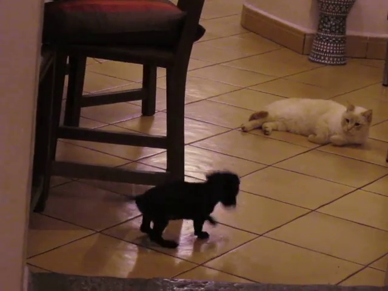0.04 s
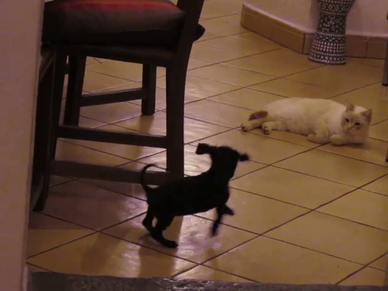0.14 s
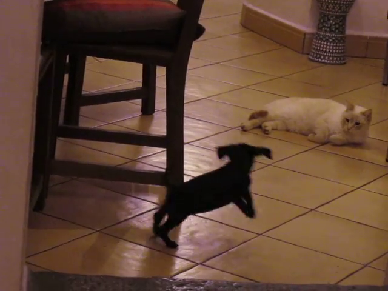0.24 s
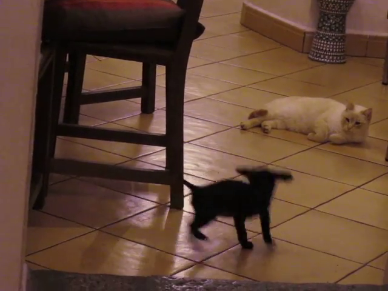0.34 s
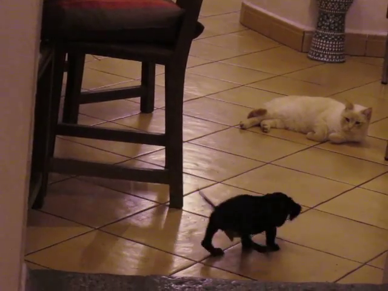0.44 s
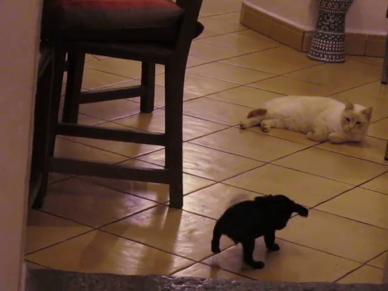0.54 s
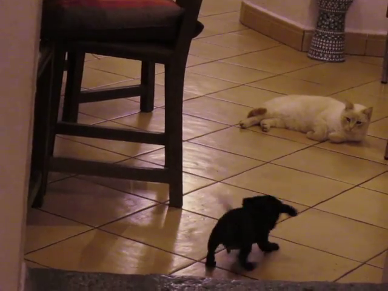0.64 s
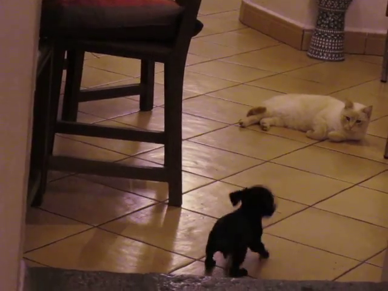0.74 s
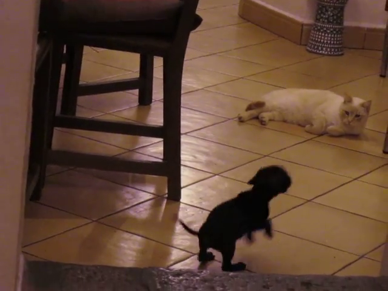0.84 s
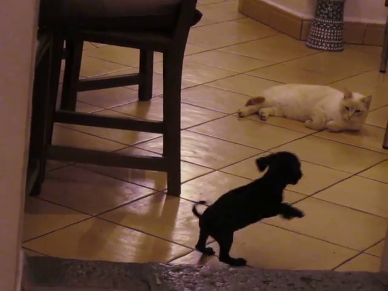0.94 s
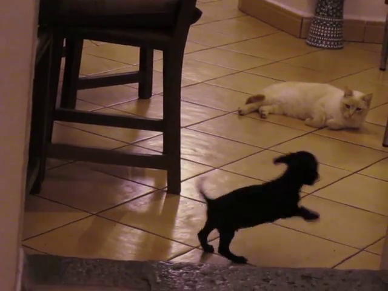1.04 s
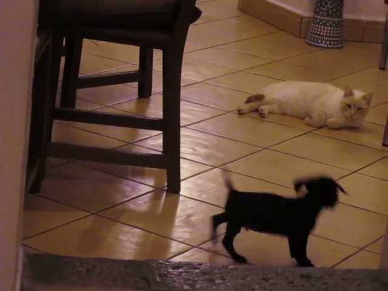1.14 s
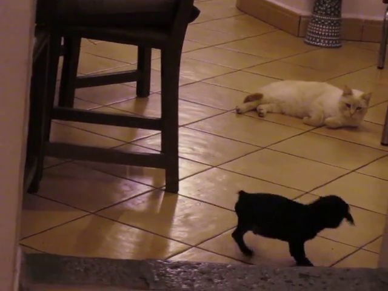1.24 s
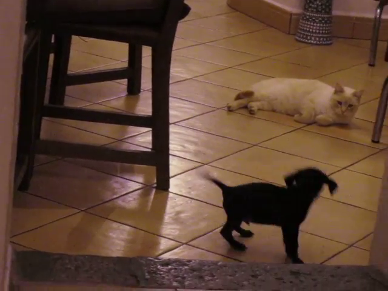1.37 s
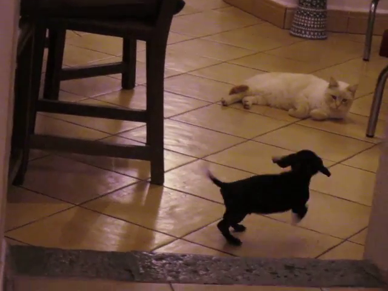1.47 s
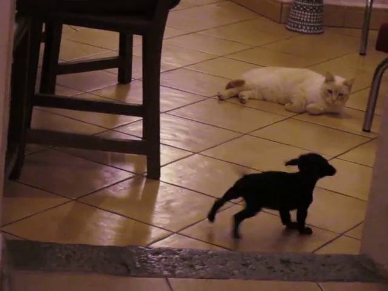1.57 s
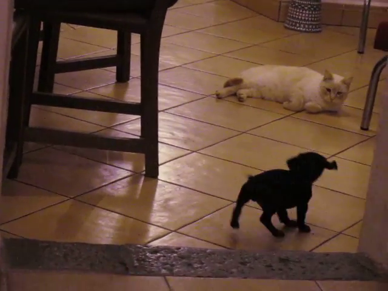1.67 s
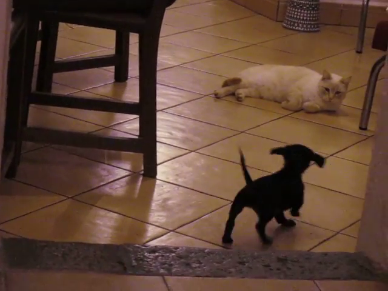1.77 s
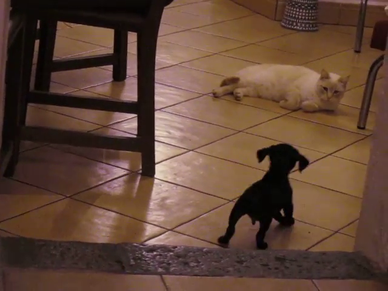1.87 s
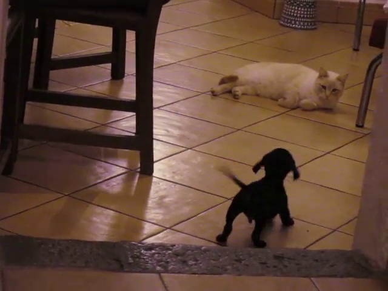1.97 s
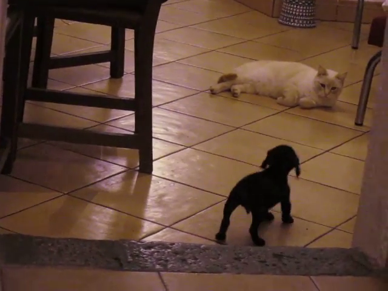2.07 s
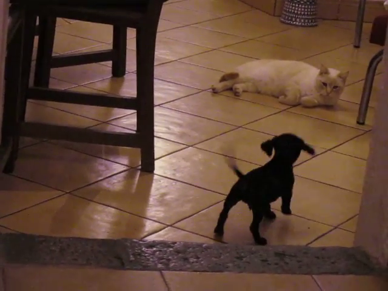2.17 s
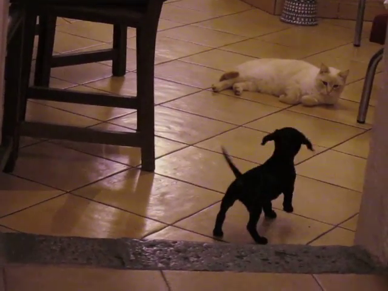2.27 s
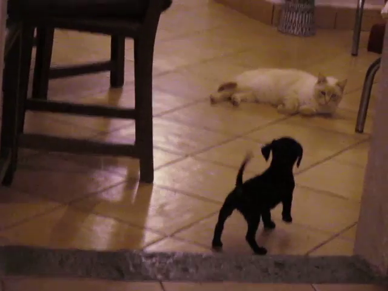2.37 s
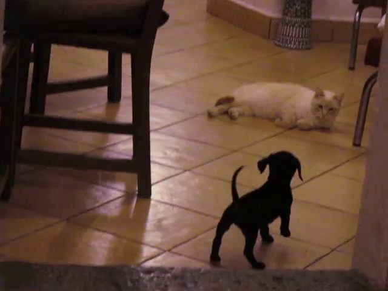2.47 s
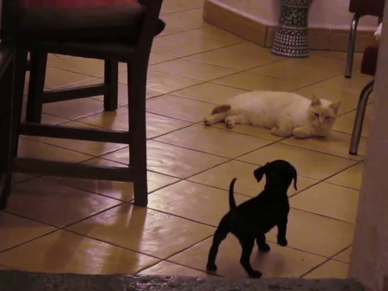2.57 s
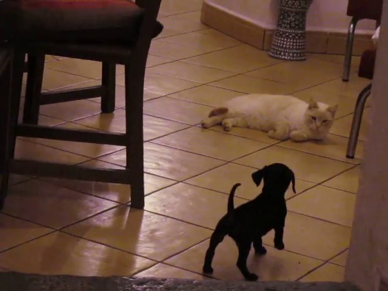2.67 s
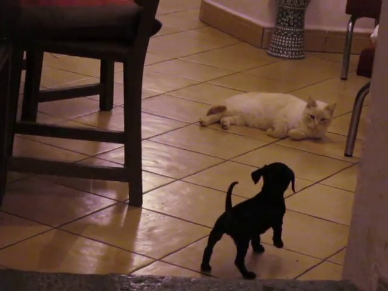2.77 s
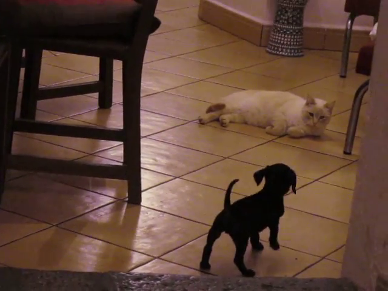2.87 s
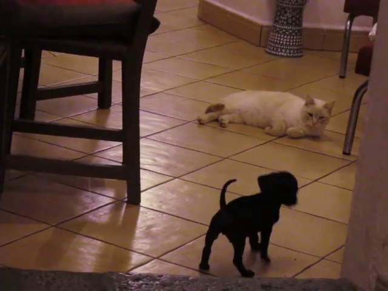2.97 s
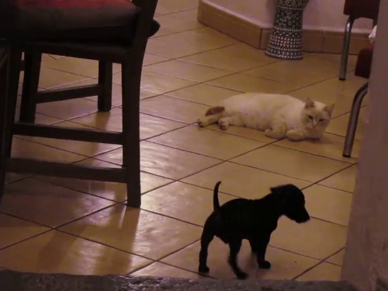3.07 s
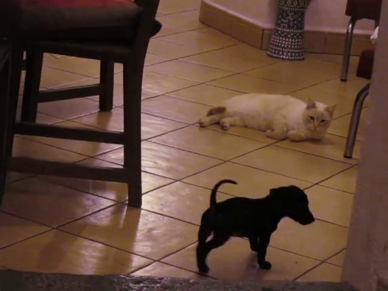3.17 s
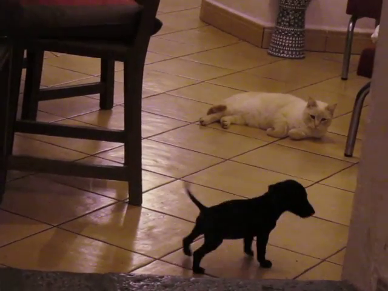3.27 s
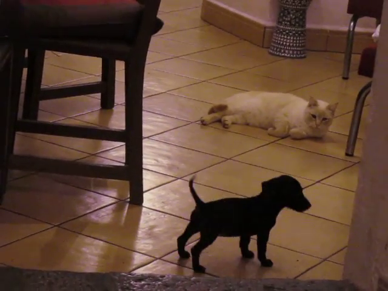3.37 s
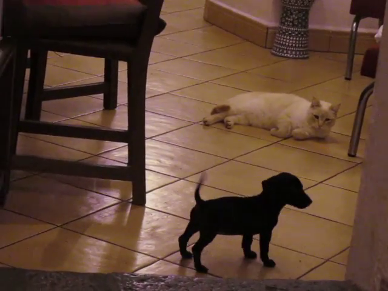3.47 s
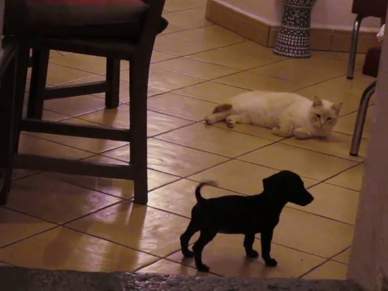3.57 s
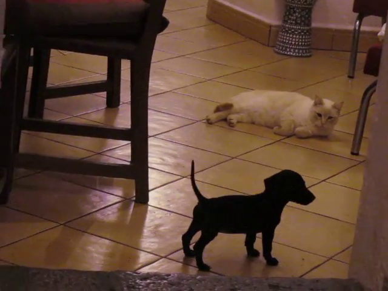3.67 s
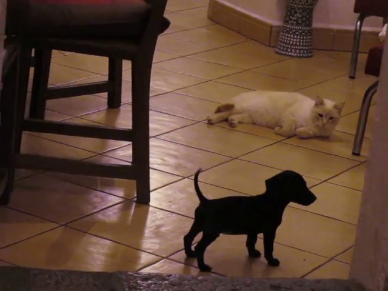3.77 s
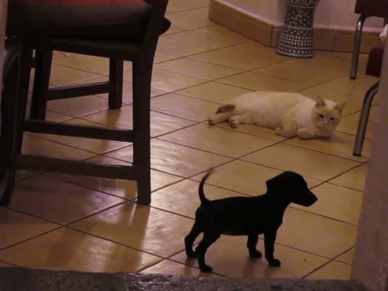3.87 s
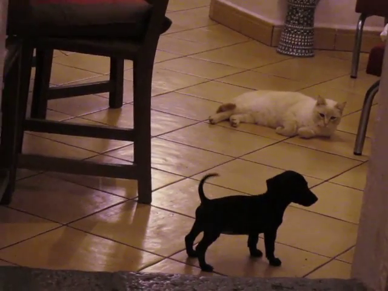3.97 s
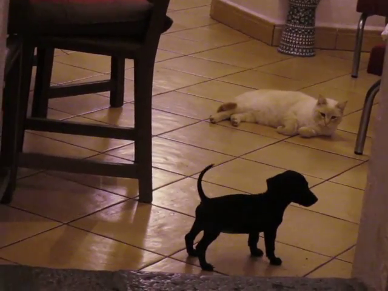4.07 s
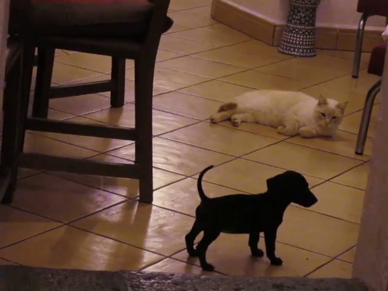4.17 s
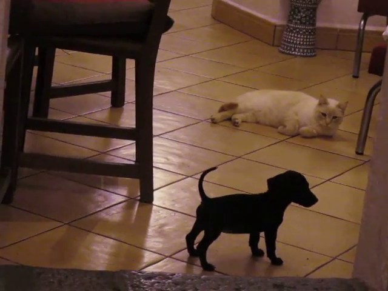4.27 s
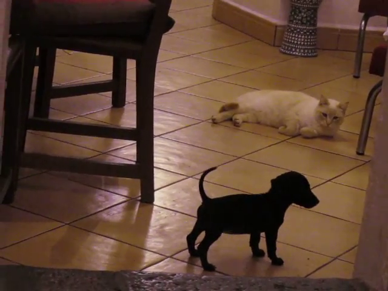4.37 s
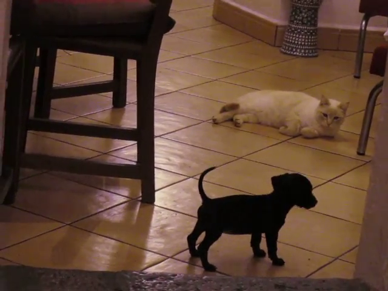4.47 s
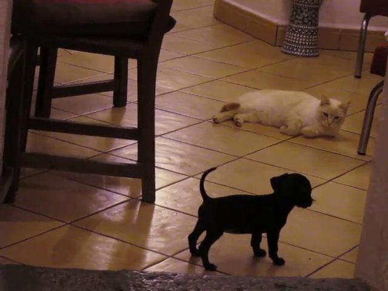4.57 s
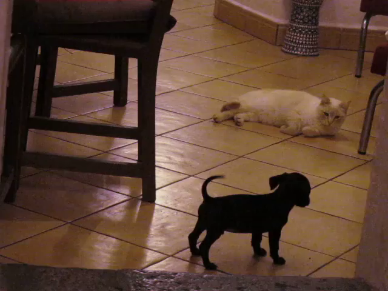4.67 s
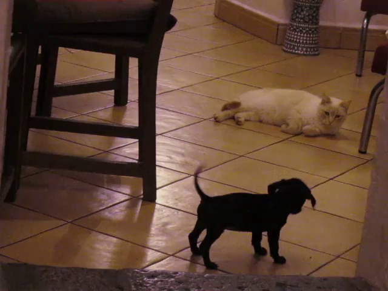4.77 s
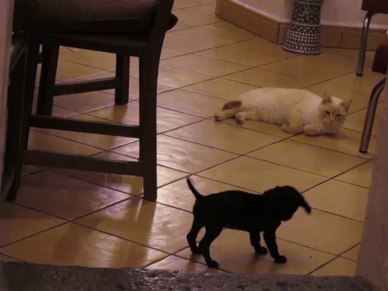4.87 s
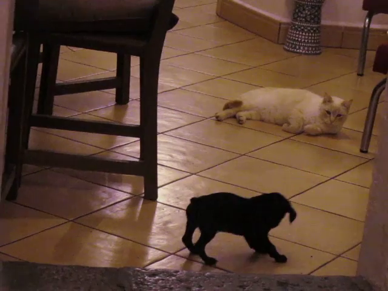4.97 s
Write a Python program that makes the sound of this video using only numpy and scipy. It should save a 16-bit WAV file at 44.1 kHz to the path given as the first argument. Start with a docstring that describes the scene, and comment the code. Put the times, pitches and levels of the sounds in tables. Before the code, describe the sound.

A small puppy gives three sharp yaps among soft growls, then grumbles and woofs quietly in an echoing tiled room.

```python
"""In a tiled room an echo dies away; a small puppy growls, yaps three times, grumbles and gives a woof.
Its voice is uneven vocal folds and turbulent air, coloured by throat, mouth or nose. Each yap bursts
out of a closed-mouth growl, starts hoarse and rises to a clear note that rings in the room.
Claws tick and pads scuff on the floor. The camera adds hiss, hum, a thin whine
and a gain control that ducks after every yap."""
import sys
import numpy as np
from scipy import signal
from scipy.fft import rfft, irfft, next_fast_len
from scipy.io import wavfile
from scipy.ndimage import uniform_filter1d, map_coordinates

SR = 44100
rng = np.random.default_rng(int(sys.argv[2]) if len(sys.argv) > 2 else 0)


def waveform_to_disk(signal):
    """Save audio, clipped to [-1, 1], as 16-bit WAV at the path in sys.argv[1]."""
    frames = np.transpose(np.atleast_2d(signal))
    scaled = np.clip(frames, -1, 1) * 32767
    samples = np.round(scaled).astype(np.int16)
    wavfile.write(sys.argv[1], SR, samples)


N = 220913
TOP_HZ = 15700  # upper edge of the harmonics and of the camera's band

# colour of the voice behind a closed mouth: f/Hz, level/dB
CLOSED_MOUTH = [(100, -20.5), (180, -12.5), (250, -5), (400, -2), (560, 6.5), (750, -5.5), (1100, -15),
                (1600, -19.5), (2600, -54.5), (4200, -39.5), (8000, -30.5), (15000, -66.5)]


def amp(db):
    """Decibels to gain."""
    return 10 ** (np.asarray(db) / 20)


def unit(x):
    """Scale to rms 1."""
    return x / np.sqrt(np.mean(x ** 2) + 1e-20)


def along(points, hz):
    """Read (Hz, value) points on a log frequency axis."""
    freqs, values = np.transpose(points)
    return np.interp(np.log(hz + 1), np.log(freqs + 1), values)


def span(start, end):
    """Sample times in seconds from start to end."""
    return np.arange(round(start * SR), round(end * SR)) / SR


def curves(rows):
    """The start time, and a per-sample curve for each column after the time."""
    times, *columns = np.transpose(rows)
    return times[0], [np.interp(span(times[0], times[-1]), times, column) for column in columns]


def wobble(rate, size):
    """A smooth random curve, rate knots a second."""
    knots = rng.standard_normal(int(size * rate / SR) + 4)
    return map_coordinates(knots, [np.arange(size) * rate / SR])


def placed(onset, x):
    """A full-length track on which x starts at onset seconds."""
    track = np.zeros(N)
    slot = track[max(round(onset * SR), 0):][:len(x)]
    slot += x[:len(slot)]
    return track


def filtered(x, gain):
    """Equalise x with the curve gain(Hz)."""
    size = next_fast_len(len(x) + 8192)
    return irfft(rfft(x, size) * gain(np.fft.rfftfreq(size, 1 / SR)), size)[:len(x)]


def noise(colour, size):
    """Noise of rms 1 with a (Hz, dB) colour."""
    return unit(filtered(rng.standard_normal(size), lambda hz: amp(along(colour, hz))))


def bump(hz, centre, width):
    """A resonance's shape, 1 at its centre."""
    return 1 / (1 + (2 * (hz - centre) / width) ** 2)


def voice(pitch, rough, tract_db, jitter, doubling, focus, shimmer_db=3, harmonics=20):
    """Vocal folds and turbulent air sound through a tract whose gain is tract_db(Hz, sample)."""
    n = len(pitch)
    now = np.arange(n)
    rough = np.clip(rough, .02, 1)
    rasp = np.sqrt(rough)
    # rough folds swing unevenly in period and in strength
    phase = 2 * np.pi * np.cumsum(pitch * (1 + jitter * rasp * wobble(265.2, n))) / SR
    flutter = unit(amp(shimmer_db * rasp * wobble(132.3, n)))
    # every other swing differs, which puts weak lines halfway between the harmonics
    ratios = np.arange(2, 2 * harmonics + 1)[:, None] / 2
    lines = np.where(ratios % 1, doubling * rasp, 1) * (ratios * pitch < TOP_HZ)
    # hard-driven folds couple to the tract and favour the harmonics that sit on a resonance
    gains = lines * amp(focus * tract_db(ratios * pitch, now))
    partials = gains * np.sin(ratios * phase + 2 * np.pi * rng.random(ratios.shape))
    tone = np.sum(partials, 0) / np.sqrt(np.sum(gains ** 2, 0) / 2)
    # turbulent air takes the colour of the same tract
    hz, t, white = signal.stft(rng.standard_normal(n), SR, nperseg=512)
    shape = amp(tract_db(hz[:, None], np.minimum((t * SR).astype(int), n - 1)))
    air = unit(signal.istft(white * shape / np.linalg.norm(shape, axis=0), nperseg=512)[1][:n])
    fades = np.minimum(np.minimum(now, n - now) / (.003 * SR), 1)
    sound = fades * flutter * (np.sqrt(1 - rough) * tone + rasp * air)
    # the voice carries no bass below about 140 Hz
    return filtered(sound, lambda hz: 1 - 1 / (1 + (hz / 140) ** 8))


def rattle(pitch, db, rough, colour):
    """Slack folds rattle behind a closed mouth."""
    return amp(db) * voice(pitch, rough, lambda hz, i: along(colour, hz), jitter=.06, doubling=.6, focus=1)


def ring_and_growls():
    """A brief low ring, then growls that swell, a track each; pitch and level wander together."""
    # first the low ring of an earlier yap dying away at the start, then closed-mouth growls:
    # t/s, length/s, pitch/Hz, level/dB, roughness (full at 1)
    cues = [(0, 0.0145, 210.5, -35, 1.2), (.492, 0.25, 212, -35.5, 0.46), (1.348, 0.028, 183, -44, 0.64),
            (1.373, 0.038, 201.2, -38.5, 0), (1.89, 0.028, 192, -40, 0.74)]
    swell_db, swell_s = 4.5, .04
    tracks = []
    for onset, length, hz, db, rough in cues:
        t = span(0, length)
        drift = wobble(22, len(t))
        level_db = db - swell_db * np.exp(-t / swell_s) + drift
        tracks.append(placed(onset, rattle(hz * (1 + .03 * drift), level_db, rough, CLOSED_MOUTH)))
    return tracks


def wash_and_paws():
    """After an opening wash of echo, claws tick on the tiles and pads slide over them."""
    # claw ticks: t/s, level/dB
    ticks = [(0.399, -52), (.602, -46.5), (0.697, -46), (1.736, -61), (3.23, -57.5)]
    # bright click of claw on tile: f/Hz, level/dB
    tick_colour = [(1000, -28), (5000, -19.5), (8500, 6), (11000, -1.5), (15000, -16.5)]
    # first a diffuse wash of room echo fading at the start, then two pad slides: t/s, length/s, level/dB
    swishes = [(0, .028, -38.5), (0.521, 0.11, -66), (0.637, .076, -62)]
    # noise colour shared by the wash and the slides: f/Hz, level/dB
    swish_colour = [(120, -19), (250, 13), (900, 4), (1500, -5), (3000, -8), (5000, -5), (7500, -1),
                    (10000, -5), (12000, -15), (15500, -25.5)]
    track = np.zeros(N)
    t, tick_t60 = span(0, .1), .025
    for onset, db in ticks:
        track += placed(onset, amp(db - 60 * t / tick_t60) * noise(tick_colour, len(t)))
    for onset, length, db in swishes:
        n = round(length * SR)
        envelope = amp(1.4 * wobble(170, n)) * signal.windows.tukey(n)
        track += placed(onset, amp(db) * unit(envelope * noise(swish_colour, n)))
    return track


def tiled_room(x, bounce_db=-18, tail_db=-2.5, bloom_s=.014):
    """Direct sound, first bounces off tiles and walls, and a long diffuse ring."""
    # reverb time of the room: f/Hz, t60/s
    ring_times = [(150, 0.51), (500, 0.69), (1100, 0.73), (2500, 0.6), (5500, 0.59), (9000, 0.52),
                  (15000, 0.31)]
    hz, t, white = signal.stft(rng.standard_normal(SR), SR, nperseg=256)
    decay = amp(-60 * t / along(ring_times, hz)[:, None])
    bloom = 1 - np.exp(-t / bloom_s)
    tail = signal.istft(white * decay * bloom, SR, nperseg=256)[1]
    response = amp(tail_db) * tail / np.linalg.norm(tail)
    bounces_s = rng.uniform(.001, .028, size=8)
    response[(bounces_s * SR).astype(int)] += amp(bounce_db)
    response[0] += 1  # direct sound
    return signal.fftconvolve(x, response)[:N]


def noise_floor():
    """A bed of even hiss with a wavering low hum and a thin whine."""
    # colour of the still room and the microphone: f/Hz, level/dB
    hiss_colour = [(15, -21), (25, 0), (49, 3), (86, -13), (119, -7), (164, -17), (204, -9), (322, -13.5),
                   (399, -18), (523, -16.5), (582, -17), (2560, -22), (5730, -29), (7700, -25.5),
                   (15500, -40.5)]
    # two hums and the whine: f/Hz, level/dB
    hums = [(38, -63), (123.8, -78), (7795, -75.5)]
    t = np.arange(N) / SR
    tones = sum(amp(db) * unit(np.sin(2 * np.pi * hz * t + .99 * wobble(8, N))) for hz, db in hums)
    return amp(-54.5) * noise(hiss_colour, N) + tones


def windup_pitch(t, burst_hz=297.1, octaves_per_s=7):
    """The folds tighten steadily towards the burst at t = 0."""
    return burst_hz * 2 ** (octaves_per_s * t)


def windup(burst_s, db):
    """A closed-mouth growl swells and climbs into a yap, then gives way as the mouth opens."""
    start, peak, end = -.068, -.018, .011  # seconds from the burst
    t = span(start, end)
    swell_db = np.interp(t, [start, peak, end], [-18, 0, -5.5])
    return placed(burst_s + start, rattle(windup_pitch(t), db + swell_db, rough=.32, colour=CLOSED_MOUTH))


def yap(burst_s, length, first_hz, top_hz, db, clear_rough, clear_s, closed, bright_db,
        windup_db, rasp_s, rasp_db):
    """The pitch shoots up as closing lips pull down the lower resonances, picking out harmonics in turn."""
    # colour of the voice through an open mouth: f/Hz, level/dB
    open_mouth = [(150, -67), (330, -11), (680, -11), (1000, -10), (1700, -8.5), (3400, -16.5),
                  (4300, -17.5), (5600, -22.5), (6700, -32), (8700, -32.5), (9500, -40), (15500, -42.5)]
    # mouth resonances: f wide open/Hz, f lips nearly closed/Hz, width/Hz, boost/dB
    formants = [(1253, 1003, 282, 12), (2878, 1983, 505, 13.5), (3804, 2900, 630, 12),
                (5970, 4860, 860, 12), (7700, 9250, 1500, 8), (10230, 11000, 640, 11)]
    leap_s, climb_s, sag_hz_per_s = .006, .078, 2500
    start, end = -rasp_s - .022, length + .02  # seconds from the burst
    t = span(start, end)
    # the pitch leaps out of the growl, climbs, and sags in the release
    note = np.interp(t, [0, climb_s], [first_hz, top_hz]) - sag_hz_per_s * np.maximum(t - length, 0)
    leap = 1 / (1 + np.exp(-t / leap_s))
    pitch = (1 - leap) * windup_pitch(t) + leap * note
    # a rasp fades in, then a fast attack across the burst, a hold, a release
    level_db = np.interp(t, [start, -rasp_s, -.024, .016, length, end],
                         [rasp_db - 17.5, rasp_db - 3.5, rasp_db, db, db, db - 4.5])
    # hoarse at the burst, clear in the hold, fraying again in the release
    rough = np.interp(t, [0, clear_s, length, end], [.77, clear_rough, clear_rough, .84])
    # the lips narrow a little as the note clears, and close late in the yap
    closing = np.interp(t, [0, clear_s, .04, .062], [0, .35, .35, closed])
    # treble slope in dB per octave: duller below full voice and behind closing lips
    tilt_db = bright_db + .31 * (level_db - db) - 1.5 * closing

    def tract_db(hz, i):
        """The mouth's gain at sample i."""
        peaks = sum(peak_db * bump(hz, wide + (narrow - wide) * closing[i], width)
                    for wide, narrow, width, peak_db in formants)
        return along(open_mouth, hz) + peaks + tilt_db[i] * np.log2(1 + hz / top_hz)

    growl = windup(burst_s, windup_db)
    bark = amp(level_db) * voice(pitch, rough, tract_db, jitter=.036, doubling=.5, focus=1.5)
    return growl + placed(burst_s + start, bark)


def second_tone(onset, length, hz, db, fall_hz_per_s=1700):
    """An independent tone in the voice slides down near the lowest resonance."""
    t = span(0, length)
    pitch = (hz - fall_hz_per_s * t) * (1 + .022 * wobble(213, len(t)))
    tone = unit(np.sin(2 * np.pi * np.cumsum(pitch) / SR))
    return placed(onset, amp(db) * tone * signal.windows.tukey(len(t), .5))


def yaps():
    """Three yaps, a track each, with a second tone layered into every one."""
    # yaps: burst t/s, length/s, first pitch/Hz, top pitch/Hz, level/dB, roughness once clear (0-1),
    # time to clear/s, final lip closing (0-1), brightness/dB per octave, wind-up level/dB,
    # rasp lead/s, rasp level/dB
    cues = [ (0.784, .056, 671, 688.3, -14, 0.14, 0.044, .5, 1.36, -23, .044, -24),
            (1.441, 0.091, 653, 776.8, -10, .1, 0.025, 0.7, 1.8, -27.5, .058, -40.5),
            (2.000, 0.083, 640.4, 710.8, -11, 0.12, 0.017, 0.99, 1.1, -23, .024, -28.5), ]
    # the second tone of each yap: t/s, length/s, starting pitch/Hz, level/dB
    tones = [(.803, 0.043, 1192, -15.5), (1.445, 0.054, 1136, -14), (1.998, 0.023, 1057, -16.5)]
    return [yap(*cue) + second_tone(*tone) for cue, tone in zip(cues, tones)]


def grumble(push_db=3.5, push_s=.02):
    """A long, evenly rough mutter deep in the throat starts with a small push."""
    # contour of the grumble: t/s, pitch/Hz, level/dB
    contour = [(2.822, 174.2, -42.5), (2.906, 171.2, -46.5), (2.95, 149, -46), (3.03, 167.8, -43),
               (3.204, 172.5, -41), (3.236, 220.9, -41.5), (3.304, 167.1, -43), (3.358, 165.3, -50),
               (3.55, 135, -55)]
    # dark colour of the throat: f/Hz, level/dB
    throat = [(90, -21), (165, -3.5), (340, -1.5), (510, -0.5), (680, -16.5), (1100, -26), (1700, -40),
              (3000, -49), (12000, -63.5)]
    onset, (pitch, db) = curves(contour)
    t = np.arange(len(pitch)) / SR
    level_db = db + push_db * np.exp(-t / push_s)
    return placed(onset, rattle(pitch, level_db, rough=.366, colour=throat))


def woof(clear_s=.15):
    """A rough murmur of the folds clears into a half-voiced note through the nose."""
    # contour of the woof: t/s, pitch/Hz, level/dB
    contour = [(4.63, 174.2, -59.5), (4.748, 173.9, -49.5), (4.764, 176.1, -46), (4.786, 234.4, -40.5),
               (4.85, 307.8, -30.5), (4.862, 314.1, -36), (4.896, 263.7, -31.5), (4.91, 255.5, -38),
               (5.009, 246.8, -35)]
    # colour of the nose: f/Hz, level/dB
    nose = [(120, -24), (190, 1.5), (255, -4), (380, -5.5), (550, 0), (780, -12), (1150, -27), (1650, -20),
            (2900, -47), (4200, -38), (5500, -46), (8000, -39), (15000, -70)]
    onset, (pitch, db) = curves(contour)
    t = np.arange(len(pitch)) / SR
    return placed(onset, rattle(pitch, db, rough=np.exp(-t / clear_s), colour=nose))


def scene():
    """The puppy hops about, so the room answers each call a little differently."""
    tracks = yaps() + ring_and_growls() + [grumble(), woof(), wash_and_paws()]
    puppy = sum(tiled_room(track) for track in tracks)
    return (puppy + noise_floor())[None]


def gain_control(x, threshold_db, release_db_per_s):
    """Loud sound pulls the gain down at once; it creeps back afterwards."""
    level_db = 10 * np.log10(np.abs(uniform_filter1d(x ** 2, SR // 50)) + 1e-12)
    over_db = np.maximum(level_db - threshold_db, 0)
    creep_db = release_db_per_s * np.arange(N) / SR
    cut_db = np.maximum.accumulate(over_db + creep_db) - creep_db
    return x * amp(-uniform_filter1d(cut_db, SR // 200))


def record(dry):
    """The camera's gain control and band limit."""
    ducked = gain_control(dry[0], threshold_db=-17.0, release_db_per_s=6.0)
    return filtered(ducked, lambda hz: hz < TOP_HZ)[None]


dry = scene()
out = record(dry)
waveform_to_disk(out)
```